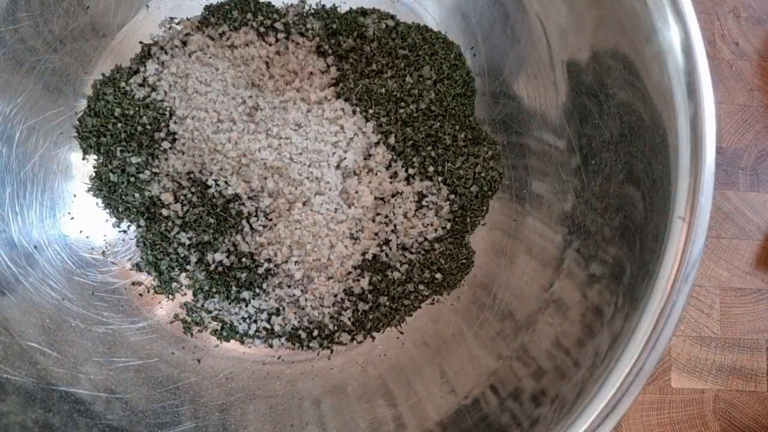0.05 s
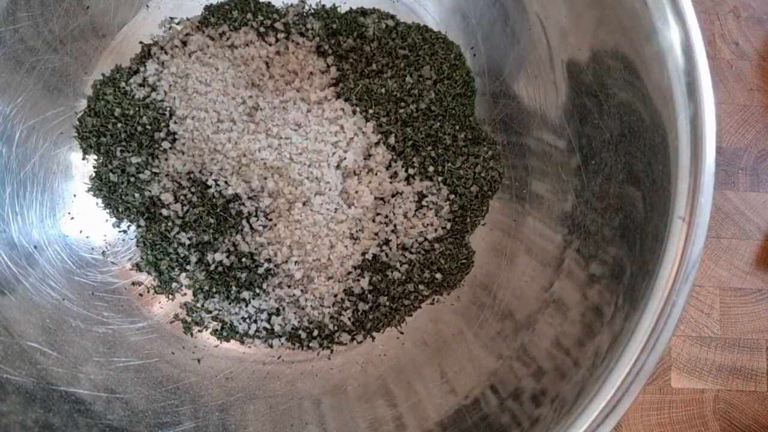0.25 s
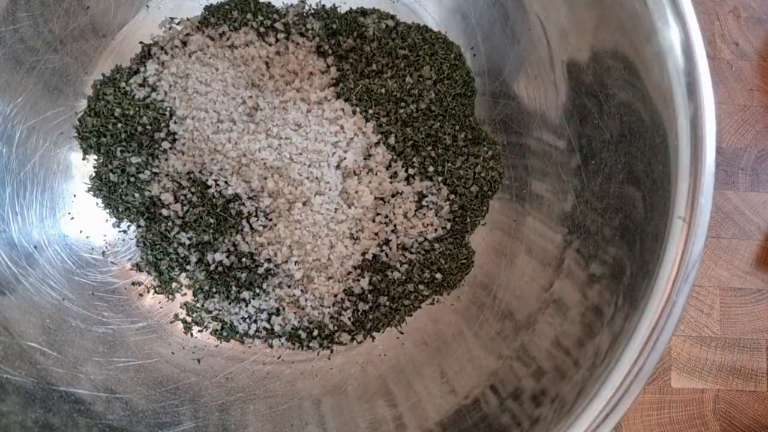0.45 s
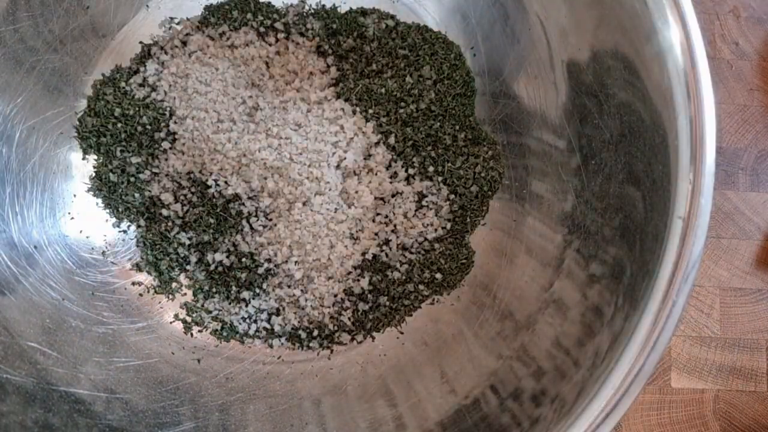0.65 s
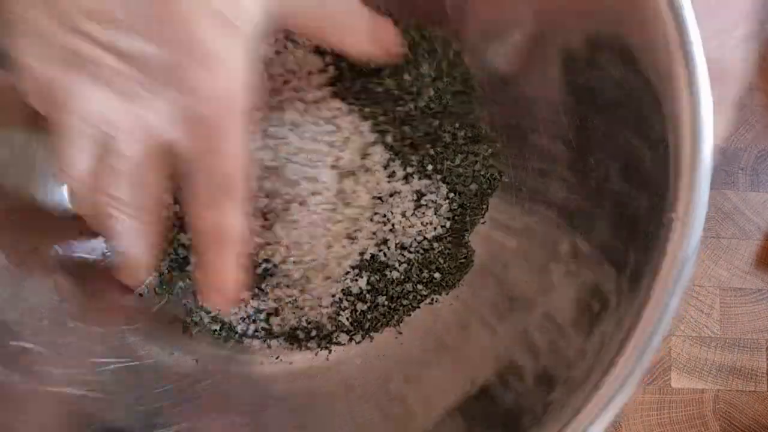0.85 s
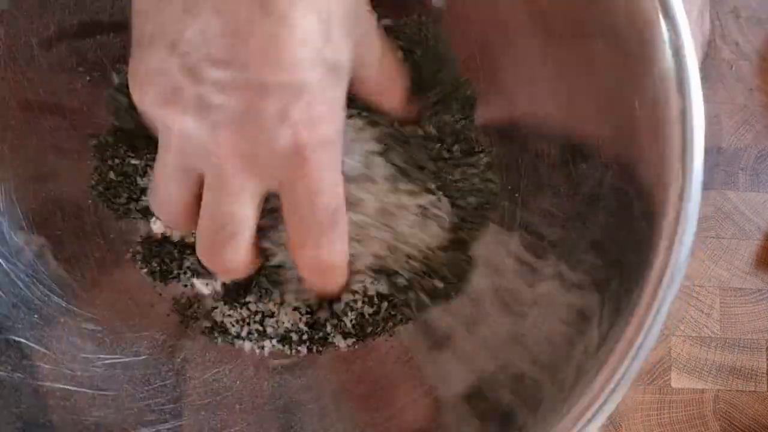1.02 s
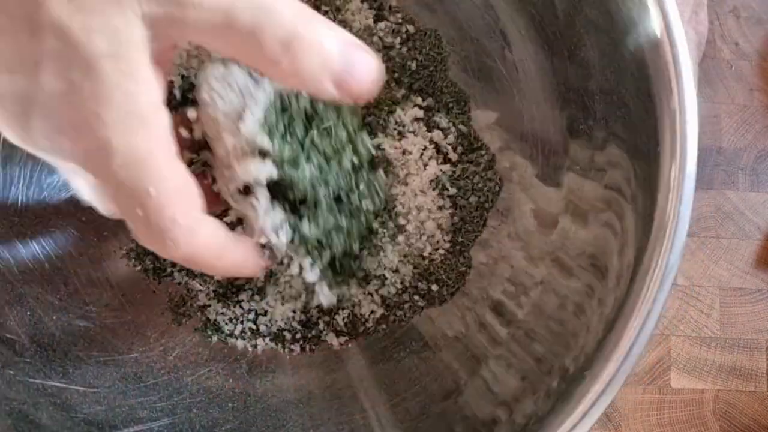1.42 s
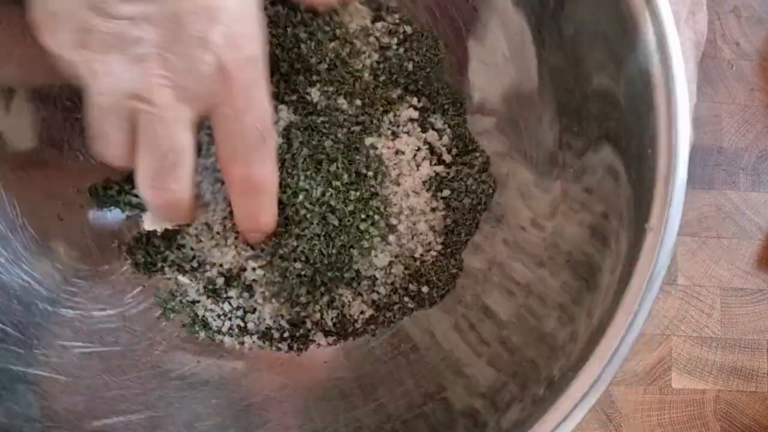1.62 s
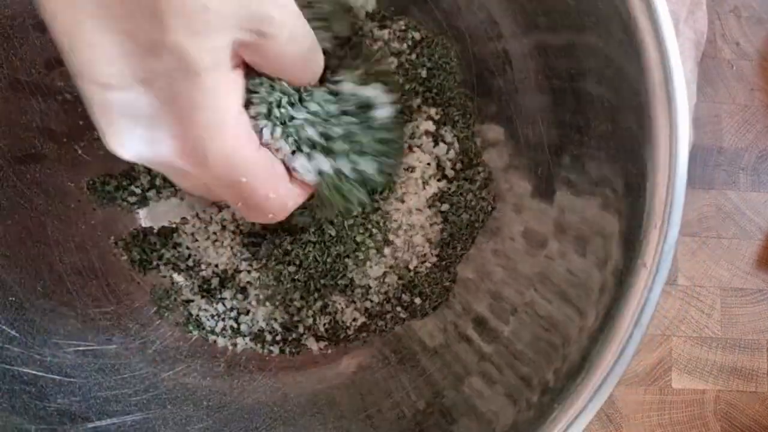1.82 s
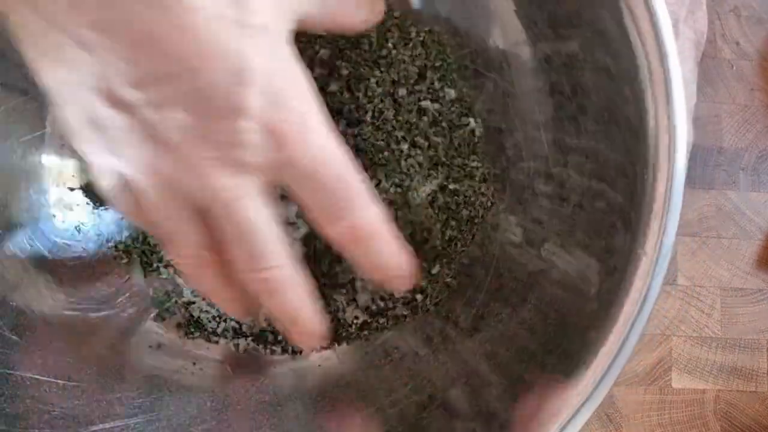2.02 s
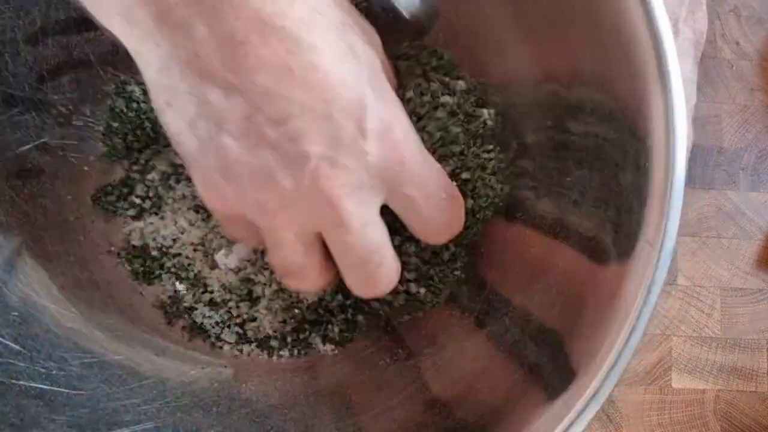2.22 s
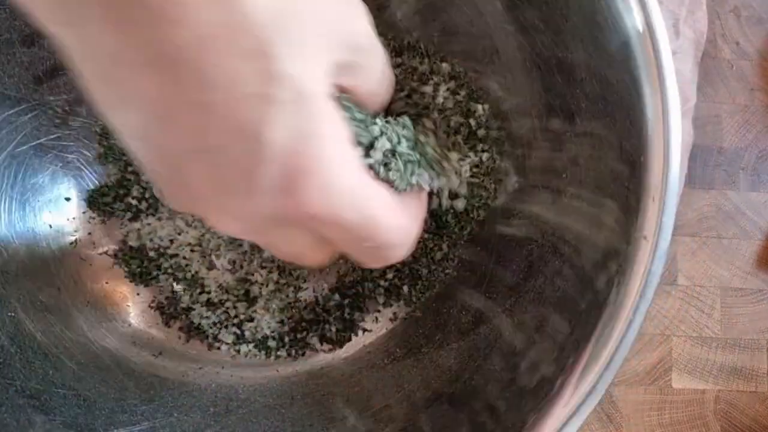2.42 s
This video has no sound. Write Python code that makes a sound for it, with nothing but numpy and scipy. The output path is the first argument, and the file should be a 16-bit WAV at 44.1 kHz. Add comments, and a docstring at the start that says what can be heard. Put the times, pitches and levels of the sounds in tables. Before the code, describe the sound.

Dried herbs and coarse salt rustle and crunch, mixed by hand in a steel bowl.

```python
"""Two dull knocks, like a cupboard door shutting, die away in a quiet kitchen. Then a hand works dried
herbs and coarse salt in a steel bowl, in three strokes. Leaves rustle and salt trickles as dense tiny
clicks; fingertips crunch into the heap, scrape the bottom and bump the bowl on its wooden board.
Something hard, probably a finger ring, ticks on the steel, loudest in the last stroke.
A close pair of microphones hears it all with the room's reverberation."""
import sys
import numpy as np
from scipy import signal
from scipy.fft import rfft, irfft
from scipy.io import wavfile

SR = 44100
rng = np.random.default_rng(int(sys.argv[2]) if len(sys.argv) > 2 else 0)


def bounce(signal):
    """Save signal as a 16-bit WAV file at the path given by the first command-line argument."""
    frames = np.transpose(np.atleast_2d(signal))
    limited = np.clip(frames, -1, 1)
    pcm = np.round(limited * 32767).astype(np.int16)
    wavfile.write(sys.argv[1], SR, pcm)


N = 112454
T = np.arange(N) / SR


def amp(db):
    """Amplitude ratio of a level in decibels."""
    return 10 ** (np.asarray(db) / 20)


def unit(x):
    """Normalisation to an rms of 1."""
    return x / np.sqrt(np.mean(x ** 2))


def at_hz(hz, points):
    """Interpolation on a logarithmic frequency axis."""
    freqs, values = np.array(points).T
    return np.interp(np.log(np.maximum(hz, 1)), np.log(freqs), values)


def convolve(x, response):
    """Convolution: a linear system answers every sample with its impulse response."""
    return signal.fftconvolve(np.atleast_2d(x), np.atleast_2d(response), axes=1)[:, :N]


def colour(x, spectrum, size=4096):
    """Minimum-phase filtering to a given spectrum; white noise keeps its power."""
    hz = np.arange(size // 2 + 1) * SR / size
    cepstrum = irfft(np.log(amp(at_hz(hz, spectrum))))
    cepstrum[1:size // 2] *= 2  # folding onto positive time makes the filter causal
    cepstrum[size // 2 + 1:] = 0
    response = irfft(np.exp(rfft(cepstrum)))
    return convolve(x, response / np.linalg.norm(response))


def rolloff(x, corner_hz, kind):
    """Second-order low-pass or high-pass: 12 dB per octave beyond the corner."""
    return signal.sosfilt(signal.butter(2, corner_hz, kind, fs=SR, output="sos"), x)


def delay(x, seconds):
    """Time shift, with silence ahead of the sound."""
    silence = np.zeros(x.shape[:-1] + (int(seconds * SR),))
    return np.concatenate([silence, x], axis=-1)[..., :N]


def swell(attack_s):
    """Exponential approach from silence to full amplitude."""
    return 1 - np.exp(-T / attack_s)


def fade(t60_s):
    """Exponential decay, by 60 dB in t60_s."""
    return np.exp(-np.log(1000) * T / t60_s)


def ring(modes, attack_s):
    """Modal superposition: a struck body vibrates as a sum of damped sinusoids."""
    return swell(attack_s) * sum(amp(db) * fade(t60) * np.sin(2 * np.pi * hz * T) for hz, db, t60 in modes)


def grains(per_s, spread_db, width=0.85):
    """Shot noise: independent clicks, a few far larger than the rest, scattered left and right."""
    size = amp(spread_db * np.minimum(rng.exponential(size=N), 4))
    clicks = (rng.random(N) < per_s / SR) * size * rng.choice([-1, 1], N)
    pan = width * rng.standard_normal(N)
    return unit(clicks * np.array([1 + pan, 1 - pan]))


def diffuse():
    """Spatial coherence: room noise is alike at both microphones in bass and top, partly opposed between."""
    # likeness of the two channels: frequency_hz, correlation
    coherence = [(60, 0.89), (150, 0.91), (300, 0.11), (550, -0.22), (1100, -0.5), (2500, -0.27),
                 (5000, -0.35), (9000, 1)]
    mid, side = rfft(rng.standard_normal((2, N)))
    alike = at_hz(np.arange(len(mid)) * SR / N, coherence)
    mid, side = mid * np.sqrt(1 + alike), side * np.sqrt(1 - alike)
    return unit(irfft(np.array([mid + side, mid - side]), N))


def tail(decay_times):
    """Reverberant decay: each octave of a diffuse field dies away at its own rate."""
    noise, centres = rfft(diffuse()), np.geomspace(60, 15000, 9)
    hz = np.arange(noise.shape[1]) * SR / N
    out = 0
    for centre in centres:
        band = at_hz(hz, list(zip(centres, centres == centre)))
        out = out + irfft(noise * band, N) * fade(at_hz(centre, decay_times))
    return out


def room_rumble():
    """Ambient noise: a faint, steady diffuse field, strongest in the bass."""
    # spectrum of the quiet kitchen: frequency_hz, level_db
    spectrum = [(15, -77), (25, -21), (137, 0.5), (285, -21.5), (335, -16.5), (659, -10), (1370, -26),
                (1650, -18.5), (2910, -25.5), (3160, -14), (3430, -23), (3920, -26), (16000, -45.5)]
    return amp(-55) * unit(colour(diffuse(), spectrum))


def room_response():
    """Impulse response of the kitchen: dense reflections follow a short gap."""
    # reverberation times: frequency_hz, t60_s
    decay_times = [(60, 0.65), (200, 0.27), (1000, 0.33), (4000, 0.37), (16000, 0.17)]
    return unit(delay(tail(decay_times), seconds=0.005)) / np.sqrt(N)


def knocks():
    """Impact across the room: a blow excites wooden modes and a reverberant tail."""
    # the two knocks: start_s, level_db, treble_corner_hz, boom_db
    blows = [(0.2357, -17, 1200, -15.5), (0.419, -11.5, 4500, -13)]
    # spectrum of a knock: frequency_hz, level_db
    spectrum = [(25, -16), (55, -10), (100, -2), (170, -1.5), (270, -14), (420, 1.5), (800, -5),
                (1400, -8.5), (2700, -16.5), (4300, -23.5), (6000, -37), (10000, -43.5), (16000, -59.5)]
    # reverberation of a knock: frequency_hz, t60_s
    decay_times = [(60, 0.61), (160, 0.62), (420, 0.35), (1100, 0.42), (2900, 0.38), (7700, 0.23)]
    # modes of the wood: frequency_hz, level_db, t60_s
    wood_modes = [(81.8, -17, 1.5), (91.2, 1, 0.39), (132.6, -6, .36), (172, -1.5, 0.14), (196, -8, 0.33),
                  (235.4, -12.5, 0.45), (343.8, -3, .34), (413, -8.5, 0.15), (502, -9.5, 0.36),
                  (512.8, -1.5, 0.22), (821, -4, 0.14), (1230, -4.5, 0.18), (1494, -20, .22),
                  (1492, -16, 0.18), (2020, -21, 0.25)]
    boom, out = ring(wood_modes, attack_s=0.0099), 0
    for start_s, level_db, corner_hz, boom_db in blows:
        blow = amp(level_db + 3) * rng.standard_normal(N) * fade(t60_s=0.051)
        direct = colour(blow, spectrum)[0] + amp(boom_db) * boom
        reflected = amp(level_db) * colour(tail(decay_times), spectrum)
        heard = np.array([direct, delay(direct, seconds=0.00043)]) + reflected
        out = out + delay(rolloff(heard * swell(attack_s=0.0014), corner_hz, "low"), start_s)
    return out * amp([[-1], [1]])  # slightly louder on the right


def bowl_bumps():
    """Damped oscillation: the bumped bowl rocks for a few cycles and the board thuds under it."""
    # bumps of the hand: start_s, level_db, pitch_hz, thud_db, thud_corner_hz
    bumps = [(0.866, -15.5, 531, -43, 100), (0.884, -34, 493, -26.5, 130), (0.9398, -14, 498, -26, 90.7),
             (0.9748, 1.5, 485.6, -28, 65), (1.533, -25, 522, -39.5, 198), (1.5714, -17.5, 254, -34.5, 246),
             (1.6582, -11, 456, -36.5, 222), (2.125, -35, 224, -25.5, 113), (2.1452, -5, 272, -22.5, 223),
             (2.156, -17, 216, -34, 250)]
    # rocking modes of the bowl: pitch_ratio, level_db, t60_s
    rocking_modes = [(.8, -11, 0.035), (1.06, 4, 0.02), (1.65, 1.5, 0.016), (2.3, -11, 0.025),
                     (3.3, -22, 0.037)]
    # modes of board and counter: frequency_hz, level_db, t60_s
    board_modes = [(56, -13, 0.14), (83.2, 4.5, 0.08), (130, 4.5, 0.098), (184, 0, 0.12),
                   (236.3, -7.5, 0.77)]
    board, out = ring(board_modes, attack_s=0.0028), 0
    for start_s, level_db, pitch_hz, thud_db, corner_hz in bumps:
        bowl = ring([(pitch_hz * ratio, db, t60) for ratio, db, t60 in rocking_modes], attack_s=0.0019)
        bowl = rolloff(bowl + 1e-18, 0.6 * pitch_hz, "high")  # it radiates little below its pitch
        thud = rolloff(board, corner_hz, "low")
        out = out + delay(amp(level_db) * bowl + amp(thud_db) * thud, start_s)
    return np.array([out, delay(out, seconds=0.00012)])


def steel_ticks():
    """Hard impact: a brief contact gives a bright crack and excites the high modes of the steel."""
    # contacts with the bowl: start_s, level_db
    contacts = [(0.831, -47), (0.841, -44), (1.233, -24), (1.2464, -22.5), (1.2555, -29.5), (1.625, -27),
                (1.8831, -34), (1.911, -30.5), (2.0166, -33.5), (2.0861, -10)]
    # spectrum of the crack: frequency_hz, level_db
    spectrum = [(1000, -33), (3500, -16.5), (4500, -10), (5200, 1), (6500, 3.5), (8000, -4.5),
                (10500, -9.5), (13000, -8.5), (16000, -12)]
    # modes of the steel bowl: frequency_hz, level_db, t60_s
    steel_modes = [(4480, 4, .05), (5430, 1, 0.082), (4980, 3.5, .13), (5450, 9, 0.069), (6320, 7, .13),
                   (6640, -6.5, .12), (7000, -13, 0.1), (7590, -4.5, 0.18)]
    out = 0
    for start_s, level_db in contacts:
        rattle = grains(per_s=35000, spread_db=1) * swell(attack_s=0.00044) * fade(t60_s=0.027)
        excited = [(hz, db + 2 * rng.standard_normal(), t60) for hz, db, t60 in steel_modes]
        steel = amp(-22) * ring(excited, attack_s=0.0009)
        out = out + amp(level_db) * delay(colour(rattle, spectrum) + steel, start_s)
    return out


def scrapes():
    """Stick-slip friction: salt catches and slides between fingers and steel."""
    # drags over the bottom of the bowl: peak_s, level_db, half_length_s
    drags = [(0.857, -51, 0.01), (0.885, -25, 0.014), (1.108, -35, 0.011), (1.766, -38.5, .018),
             (2.061, -41, 0.007), (2.21, -40, 0.071), (2.32, -42.5, 0.015)]
    # spectrum of a scrape: frequency_hz, level_db
    spectrum = [(100, -14), (300, -24), (480, 8), (700, 0), (1050, -2.5), (1600, -5.5), (4000, 0),
                (16000, -38)]
    drag = sum(amp(db) * np.exp(-((T - peak_s) / half_s) ** 2) for peak_s, db, half_s in drags)
    return colour(grains(per_s=900, spread_db=2) * drag, spectrum)


def crunches():
    """Brittle fracture: the heap breaks under the fingertips in short showers of cracks."""
    # presses into the heap: start_s, level_db, length_s
    presses = [(0.8667, -29.5, 0.014), (0.8849, -20.5, 0.0065), (0.9388, -25.5, 0.0039),
               (0.944, -23, 0.004), (1.314, -48, 0.0033), (1.495, -40, 0.01), (1.507, -34.5, 0.014),
               (2.046, -32, 0.019), (2.125, -33, 0.026)]
    # spectrum of a crunch: frequency_hz, level_db
    spectrum = [(100, -13.5), (300, -6), (520, 5.5), (1000, -5.5), (1700, -3.5), (2800, 2.5), (3800, -1),
                (5200, 1), (7000, -6), (10000, -14), (16000, -10)]
    release_s, envelope = 0.0025, 0
    for start_s, level_db, length_s in presses:
        release = np.exp(-np.maximum(T - start_s - length_s, 0) / release_s)
        envelope = envelope + amp(level_db) * (T >= start_s) * release
    return colour(grains(per_s=8300, spread_db=2) * envelope, spectrum)


def clumps(per_s, spread_db):
    """Random amplitude modulation: the heap gives way in little fits and starts."""
    knots = np.arange(0, N / SR, 1 / per_s)
    return unit(amp(spread_db * np.interp(T, knots, rng.standard_normal(len(knots)))))


def rustle():
    """Granular noise: tiny contacts of leaves and salt merge into a hiss over the bowl's soft rumble."""
    # level contours of the hand's strokes: time_s, leaf_db, salt_db, rumble_db
    strokes = [(0.832, -63, -89, -67), (0.865, -55, -53, -35.5), (0.917, -59, -50, -50),
               (0.96, -37, -37.5, -32.5), (1.04, -39, -39.5, -40.5), (1.115, -43, -43, -51),
               (1.16, -47.5, -46, -62), (1.22, -56.5, -58, -53), (1.33, -65, -52, -67),
               (1.41, -91, -64, -67), (1.45, -65, -61, -72), (1.486, -45.5, -44.5, -62),
               (1.516, -50, -37, -44), (1.56, -50.5, -48, -53), (1.61, -52, -45, -48),
               (1.68, -38.5, -38, -45.5), (1.765, -40.5, -41.5, -47.5), (1.80, -58, -42, -58),
               (1.845, -87, -48.5, -59), (1.889, -43, -37, -59), (1.94, -75, -51.5, -59),
               (2.0, -75, -49.5, -76), (2.031, -40, -37.5, -58.5), (2.059, -47, -30, -65),
               (2.12, -38.5, -37, -41), (2.185, -44, -36.5, -40), (2.235, -40.5, -38, -69),
               (2.33, -48, -46.5, -71), (2.37, -60.5, -52.5, -52), (2.42, -59, -49.5, -60),
               (2.462, -91, -63.5, -53.5), (2.55, -80, -54.5, -82)]
    # spectrum of rubbing leaves: frequency_hz, level_db
    leaf_spectrum = [(100, 2), (260, -25), (550, 8), (900, 1.5), (1500, 0.5), (2700, 2.5), (4000, -5.5),
                     (7000, 0), (16000, -40.5)]
    # spectrum of trickling salt: frequency_hz, level_db
    salt_spectrum = [(1500, -32), (4000, -1.5), (5200, 5), (7000, 0), (8500, 3), (10500, -1.5), (13000, 4),
                     (16000, 4)]
    # spectrum of the bowl's rumble: frequency_hz, level_db
    rumble_spectrum = [(25, -28), (45, -13.5), (57, -2.5), (80, 11), (105, 1), (200, -20.5), (500, -87),
                       (2000, -82)]
    times, *contours = np.array(strokes).T
    leaf_gain, salt_gain, rumble_gain = (amp(np.interp(T, times, db)) * (T > times[0]) for db in contours)
    give = clumps(per_s=70, spread_db=2)
    leaves = grains(per_s=2600, spread_db=4, width=0.6) * leaf_gain * give * amp(0.5)
    salt = grains(per_s=3500, spread_db=2.5, width=0.28) * salt_gain * give
    rumble = rumble_gain * unit(colour(rng.standard_normal(N), rumble_spectrum))
    left, right = colour(leaves, leaf_spectrum)
    return np.array([left, delay(right, seconds=0.00027)]) + colour(salt, salt_spectrum) + rumble


def scene():
    """Superposition of the bowl's direct sound, its reverberation, the knocks and the ambient noise."""
    room = room_response()
    herbs = rustle() + crunches() + scrapes()
    ticks, bumps = steel_ticks(), bowl_bumps()
    reverberation = convolve(amp(-5) * herbs + amp(-4) * ticks + amp(-4.5) * bumps, room)
    return herbs + ticks + bumps + reverberation + knocks() + room_rumble()


def record(dry):
    """Clipping and band limiting: peaks stop at full scale, then a steep low-pass cuts the top."""
    top_hz = 15900
    return signal.sosfilt(signal.ellip(10, .2, 70, top_hz, fs=SR, output="sos"), np.clip(dry, -1, 1))


dry = scene()
out = record(dry)
bounce(out)
```